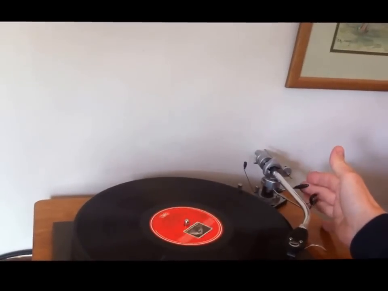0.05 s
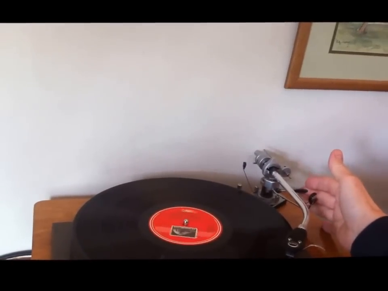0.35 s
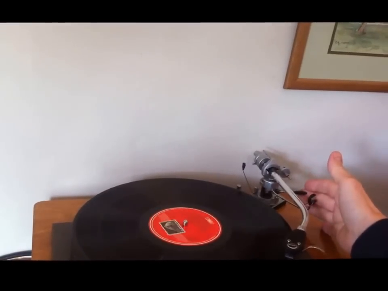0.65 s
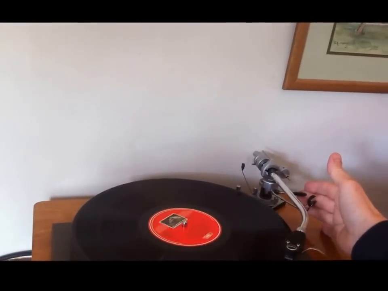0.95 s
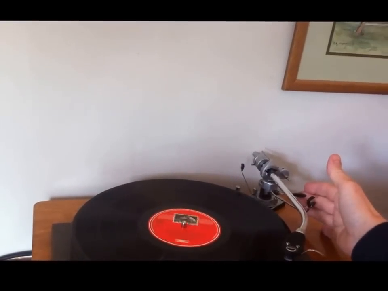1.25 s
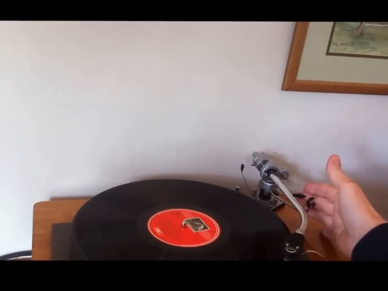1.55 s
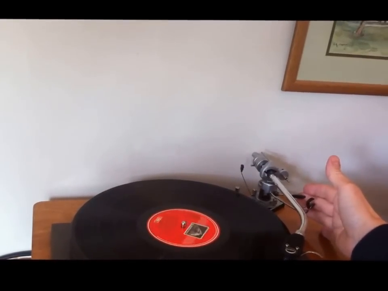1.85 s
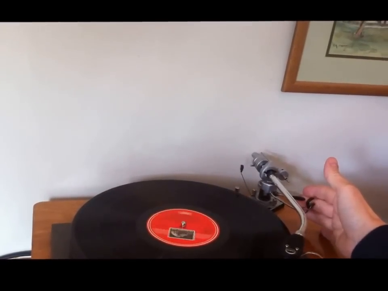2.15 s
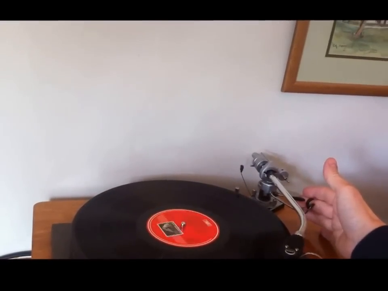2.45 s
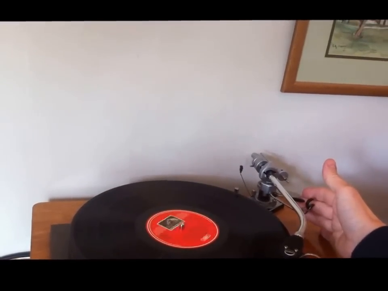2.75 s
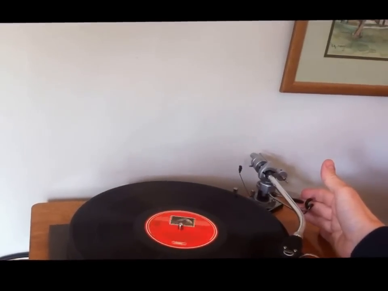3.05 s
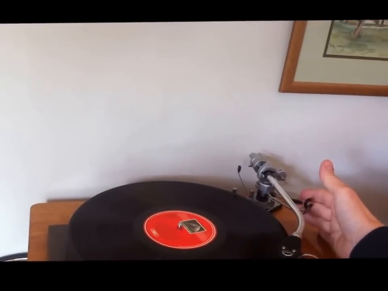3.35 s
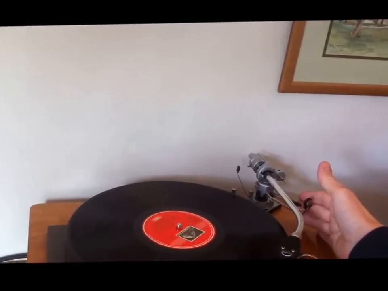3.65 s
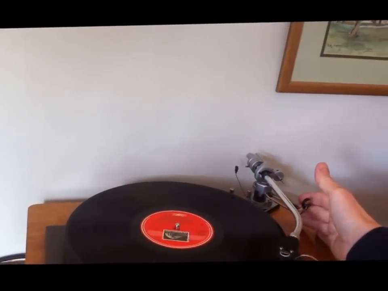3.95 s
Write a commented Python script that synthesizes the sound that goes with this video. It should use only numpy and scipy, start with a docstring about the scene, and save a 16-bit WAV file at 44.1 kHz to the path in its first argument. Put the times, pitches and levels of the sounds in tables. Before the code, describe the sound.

A dull bump on wood comes near the end, after about three seconds of faint hiss. Clothing swishes softly in short strokes around it, and the small room booms briefly. One close microphone.

```python
"""A quiet, small room, a hand waiting at the tonearm of a turntable. One close microphone.
Microphone hiss lies over a faint, low room rumble. Near the end someone shifts: clothing swishes
in short strokes as fibres catch, and something bumps dully on wood. The wood crunches and rings,
the boards give with a thud, and the room booms briefly."""
import sys
import numpy as np
from scipy import signal
from scipy.fft import rfft, irfft, next_fast_len
from scipy.io import wavfile
from scipy.ndimage import map_coordinates

SR = 44100
rng = np.random.default_rng(int(sys.argv[2]) if len(sys.argv) > 2 else 0)


def master_out(mix):
    """Clip the mix to full scale and print it as 16-bit PCM to the path in sys.argv[1]."""
    frames = np.transpose(np.atleast_2d(mix))
    ceiling = np.clip(frames, -1, 1)
    pcm = np.round(ceiling * 32767).astype(np.int16)
    wavfile.write(sys.argv[1], SR, pcm)


N = 176400


def amp(db):
    """Decibels to gain."""
    return 10 ** (np.asarray(db) / 20)


def unit(x):
    """Scale to rms 1."""
    return x / np.sqrt(np.mean(x ** 2) + 1e-20)


def along(points, hz):
    """Interpolate (Hz, value) points on a log frequency axis."""
    point_hz, values = np.transpose(points)
    return np.interp(np.log(hz + 1), np.log(point_hz + 1), values)


def curve(points):
    """Interpolate (seconds, value) points at every sample."""
    return np.interp(np.arange(N) / SR, *np.transpose(points))


def wobble(knots_per_s):
    """Smooth random curve."""
    knots = rng.standard_normal(int(N * knots_per_s / SR) + 4)
    return map_coordinates(knots, [np.arange(N) * knots_per_s / SR])


def filtered(x, response):
    """Apply the gain response(hz) by FFT."""
    size = next_fast_len(N + SR // 2)
    return irfft(rfft(x, size) * response(np.fft.rfftfreq(size, 1 / SR)), size)[:N]


def low_cut(x, hz, order):
    """Butterworth high-pass."""
    return signal.sosfilt(signal.butter(order, hz, "high", fs=SR, output="sos"), x)


def coloured(x, spectrum):
    """Shape x by (Hz, dB) points, at rms 1."""
    return unit(filtered(x, lambda hz: amp(along(spectrum, hz))))


def noise(spectrum):
    """Fresh coloured noise, rms 1."""
    return coloured(rng.standard_normal(N), spectrum)


def add(out, start_s, x):
    """Mix x into out from start_s."""
    part = out[round(start_s * SR):][:len(x)]
    part += x[:len(part)]


def ring(modes, t, attack_s):
    """Damped sines with a soft start."""
    sines = sum(amp(db - 60 * t / t60_s) * np.sin(2 * np.pi * hz * t) for hz, db, t60_s in modes)
    return sines * (1 - np.exp(-t / attack_s))


def room_decay(x, build_s=0.0053):
    """Diffuse room sound builds up, then dies at a rate set by frequency."""
    # Each row: frequency in Hz, T60 in seconds.
    room_t60 = [(80, 0.19), (250, 0.3), (1000, .29), (4000, 0.28), (12000, 0.16)]
    hz, t, bins = signal.stft(x, SR, nperseg=512)
    decay = amp(-60 * t / along(room_t60, hz)[:, None])
    tail = signal.istft(bins * decay, SR, nperseg=512)[1][:len(x)]
    return tail * (1 - np.exp(-np.arange(len(x)) / SR / build_s))


def microphone_hiss(level_db=-68, ripple_spacing_hz=1882, ripple_db=0.5, ripple_db_per_hz=0.00011):
    """Drifting hiss, slightly hollow from evenly spaced spectral ripples that deepen in the treble."""
    # Each row: frequency in Hz, relative density in dB.
    spectrum = [(15, -4), (35, -13.5), (82, -8.5), (103, -3), (130, -1.5), (245, -1), (380, -2),
                (600, -5.5), (950, -4.5), (1800, -6), (3000, -6.5), (5600, -7.5), (8000, -8.5),
                (10500, -11.5), (15600, -9.5)]
    # Each row: time in seconds, level offset in dB.
    drift = [(0, -0.5), (.85, 0.46), (1.4, 0.9), (1.7, 1.3), (2.3, 1.06), (3.2, 1.3), (4, 2.8)]

    def ripple(hz):
        depth_db = ripple_db + ripple_db_per_hz * hz
        return amp(depth_db * np.cos(2 * np.pi * hz / ripple_spacing_hz))

    return amp(level_db + curve(drift)) * unit(filtered(noise(spectrum), ripple))


def room_rumble():
    """Faint low noise of the room, wavering in level."""
    # Each row: frequency in Hz, relative density in dB.
    spectrum = [(75, -32), (100, -3), (140, -15), (180, -10.5), (202, 1), (225, -9), (247, 0.5), (300, -6),
                (500, -9), (1300, -12.5), (2000, -18.5), (3000, -21), (8000, -36.5)]
    # Each row: time in seconds, level in dB.
    levels = [(0, -77.5), (.55, -77), (.88, -77), (1.1, -76), (1.2, -73.5), (1.38, -73), (1.52, -79),
              (1.92, -72.5), (2.14, -73.5), (2.32, -70.5), (2.48, -75), (2.7, -73), (2.87, -74.5), (4, -75)]
    return amp(curve(levels)) * noise(spectrum)


def clothing(ticks_per_s=1600, tick_share=0.59, tick_spread_db=0.5, flutter_db=1.0, echo_db=-11):
    """Strokes of cloth swell and fade; fibres catch in dense tiny ticks over a low rubbing."""
    # Each row: peak time in seconds, swish in dB, rubbing in dB, rise and fall in seconds.
    strokes = [(1.46, -73, -86, .02, 0.022), (3.241, -57.5, -53.5, .022, 0.053),
               (3.275, -81, -61, 0.024, .06), (3.315, -59.5, -54.5, 0.025, 0.099),
               (3.43, -54.5, -49.5, 0.044, 0.083), (3.51, -56, -49.5, 0.019, 0.033),
               (3.632, -64, -61, 0.017, 0.03), (3.679, -53.5, -55.5, 0.023, 0.032),
               (3.759, -49.5, -62.5, 0.029, 0.044), (3.82, -78, -65.5, 0.045, 0.079),
               (3.929, -81, -60, 0.009, 0.022), (3.985, -62, -66.5, 0.025, .1)]
    # Each row of both: frequency in Hz, relative density in dB.
    swish_spectrum = [(200, -20), (900, -9.5), (1800, -7), (2850, -4.5), (3600, 0.5), (4100, 1), (4900, -4),
                      (5700, -0.5), (7200, -2.5), (8300, -6), (9500, -8), (11000, -15), (15500, -32)]
    rub_spectrum = [(30, -26), (80, -7), (140, -12), (210, 2.5), (350, 0), (600, -7.5), (1100, -13.5),
                    (2000, -20.5), (5000, -40)]
    t = np.arange(N) / SR
    swish_power, rub_power = np.zeros(N), np.zeros(N)
    for peak_s, swish_db, rub_db, rise_s, fall_s in strokes:
        age_s = t - peak_s
        envelope = np.exp(-(np.minimum(age_s, 0) / rise_s) ** 2 - np.maximum(age_s, 0) / fall_s)
        swish_power += (amp(swish_db) * envelope) ** 2
        rub_power += (amp(rub_db) * envelope) ** 2
    catches = rng.random(N) < ticks_per_s / SR
    ticks = catches * rng.choice([-1, 1], N) * amp(tick_spread_db * rng.standard_normal(N))
    fibres = np.sqrt(tick_share) * coloured(ticks, swish_spectrum)
    fibres += np.sqrt(1 - tick_share) * noise(swish_spectrum)
    # A faster stroke is brighter: its treble grows faster than its body.
    speed = np.sqrt(swish_power / swish_power.max())
    sheen = amp(-4.5) * speed * low_cut(noise(swish_spectrum), hz=5500, order=2)
    swish = np.sqrt(swish_power) * (fibres + sheen) * amp(flutter_db * wobble(knots_per_s=140))
    tail = room_decay(rng.standard_normal(SR // 2))
    echo = signal.fftconvolve(swish, tail / np.linalg.norm(tail))[:N]
    return swish + amp(echo_db) * echo + np.sqrt(rub_power) * noise(rub_spectrum)


def room_boom(t, diffuse_db=-9):
    """The room answers a bump with slowly building low modes and a diffuse tail."""
    # Each row: frequency in Hz, relative level in dB, T60 in seconds.
    modes = [(193, -12, 0.23), (215.1, -12, 0.37), (244.8, -11.5, 0.26), (316, -12.5, 0.28),
             (338, -23, 0.53), (386, -25, 0.18), (646, -22.5, 0.45), (731, -25.5, 0.26)]
    # Each row: frequency in Hz, relative density in dB.
    spectrum = [(30, -40), (80, -10), (130, -14), (190, -2), (400, 0), (750, -6), (1300, -9), (2200, -15.5),
                (4000, -29), (9000, -45)]
    diffuse = room_decay(noise(spectrum)[:len(t)])
    return ring(modes, t, attack_s=0.0053) + amp(diffuse_db) * diffuse


def wood_knock(t, attack_s=0.002, crunch_db=-15.5, crunch_t60_s=0.12, thud_delay_s=0.015):
    """A rough contact crunches and rings the wood; a deep thud follows as the boards give."""
    # Each row: frequency in Hz, relative density in dB.
    crunch_spectrum = [(200, -19), (700, -3), (1300, -19), (1900, -9), (2600, -7.5), (4000, -17),
                       (9000, -39)]
    # Each row of both: frequency in Hz, relative level in dB, T60 in seconds.
    wood_modes = [(313, -7, 0.11), (351, 7, 0.034), (481.4, -14, 0.28), (716, -17.5, 0.12),
                  (1008, -14.5, 0.071), (1237, -4.5, 0.034), (1290, -19, 0.074), (1750, -28, 0.032),
                  (2450, -29, .025), (4130, -21, 0.043)]
    thud_modes = [(85, -23, .09), (118, -20.5, 0.05), (184.4, -6.5, 0.075)]
    envelope = amp(crunch_db - 60 * t / crunch_t60_s) * (1 - np.exp(-t / attack_s))
    crunch = envelope * noise(crunch_spectrum)[:len(t)]
    knock = ring(wood_modes, t, attack_s) + crunch
    add(knock, thud_delay_s, ring(thud_modes, t, attack_s=0.003))
    return knock


def bumps(room_delay_s=0.012):
    """Each bump drives wood and room with a force pulse; a longer contact is duller."""
    # Each row: start in seconds, gain in dB, contact time in seconds.
    hits = [(3.196, -53, 0.00086), (3.241, -52.5, 0.0011), (3.374, -54, 0.0021), (3.393, -33, 0.00089),
            (3.395, -19.5, 0.00099), (3.4121, -35, .00025), (3.657, -47.5, 0.001), (3.700, -50.5, 0.0013)]
    out, t = np.zeros(N), np.arange(SR // 2) / SR
    for start_s, gain_db, contact_s in hits:
        response = wood_knock(t)
        add(response, room_delay_s, room_boom(t))
        force = np.exp(-2 * np.pi * t / contact_s)
        bump = signal.fftconvolve(response, force / force.sum())[:len(t)]
        add(out, start_s, amp(gain_db) * bump)
    return low_cut(out, hz=55.4, order=4)


def scene():
    """All sources at the one microphone."""
    return (microphone_hiss() + room_rumble() + clothing() + bumps())[None]


def record(dry):
    """Brick-wall low-pass."""
    top_hz = 15740
    return np.array([filtered(x, lambda hz: hz < top_hz) for x in dry])


dry = scene()
out = record(dry)
master_out(out)
```